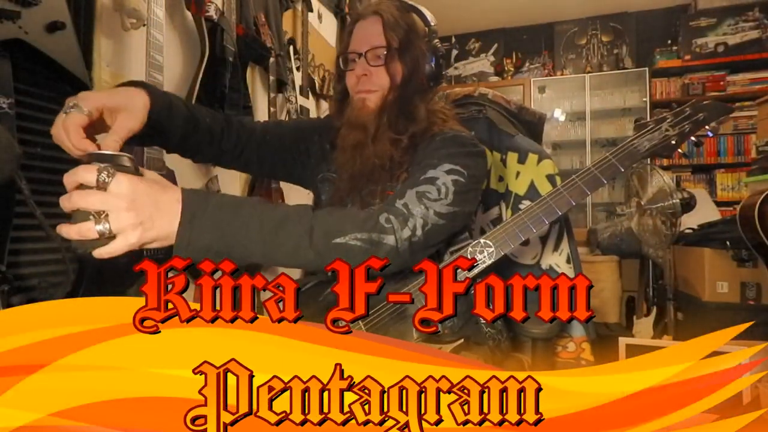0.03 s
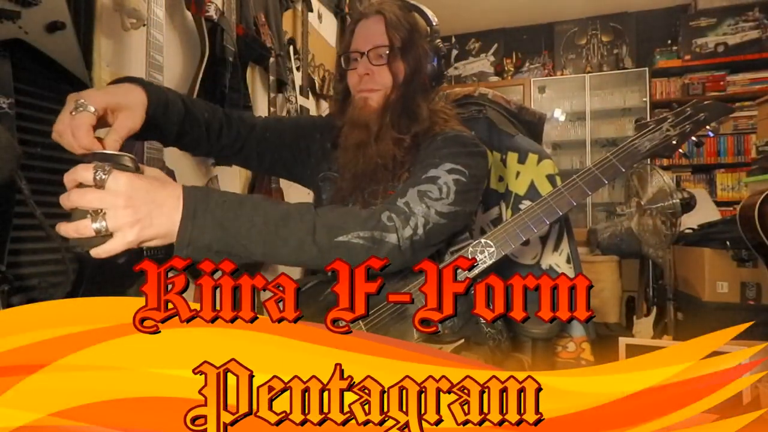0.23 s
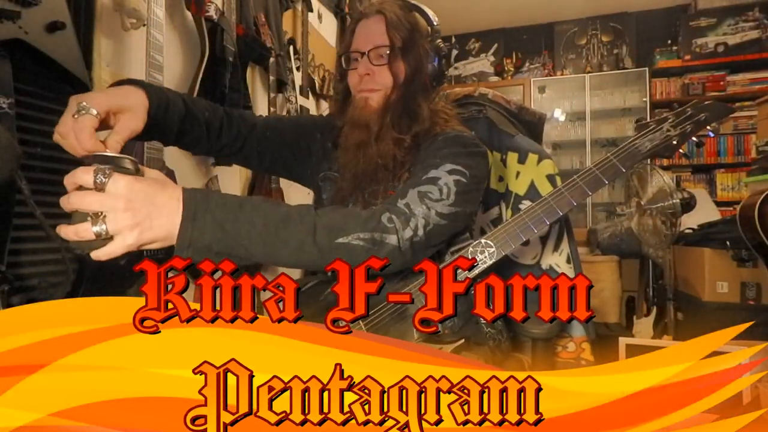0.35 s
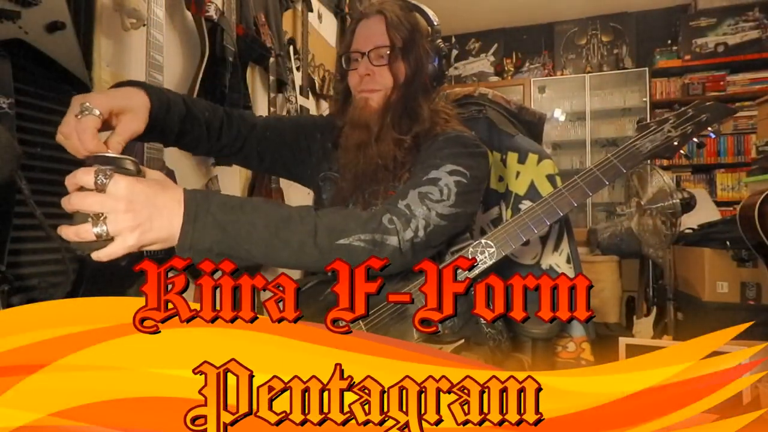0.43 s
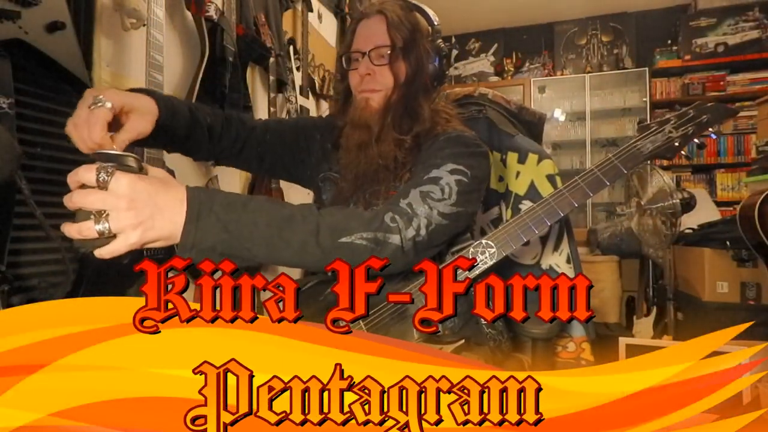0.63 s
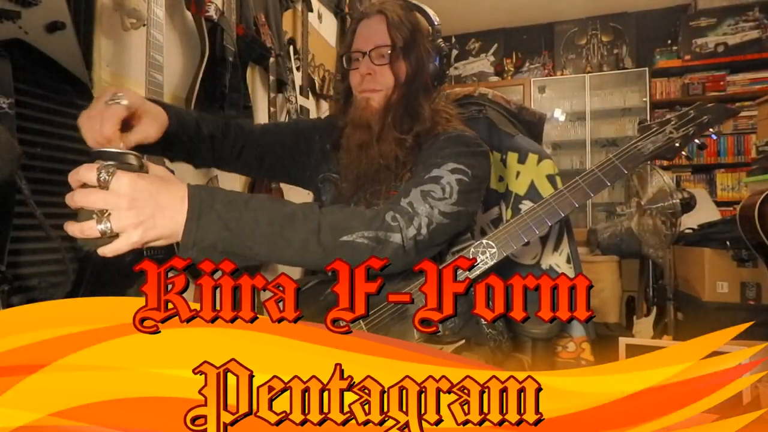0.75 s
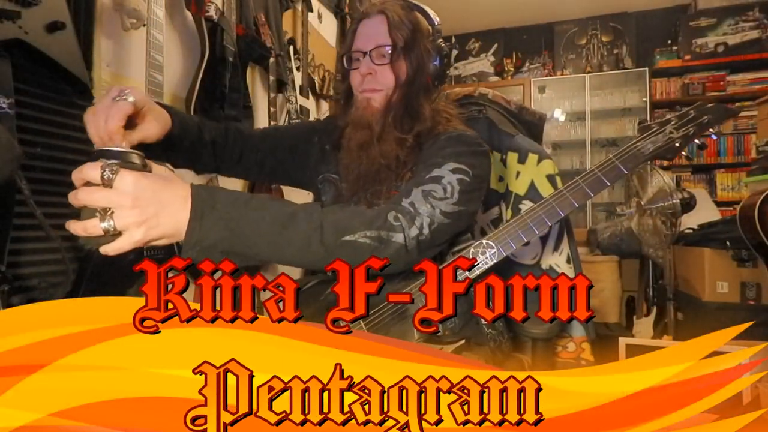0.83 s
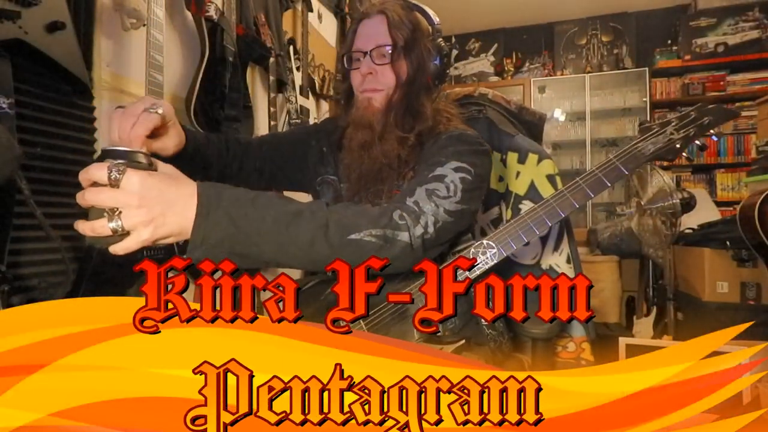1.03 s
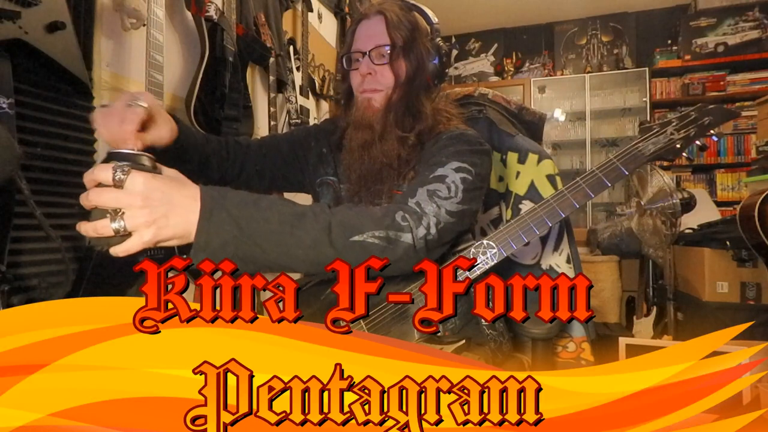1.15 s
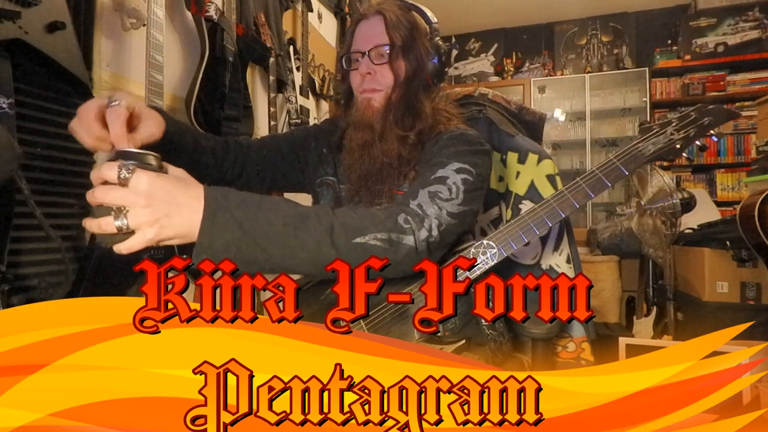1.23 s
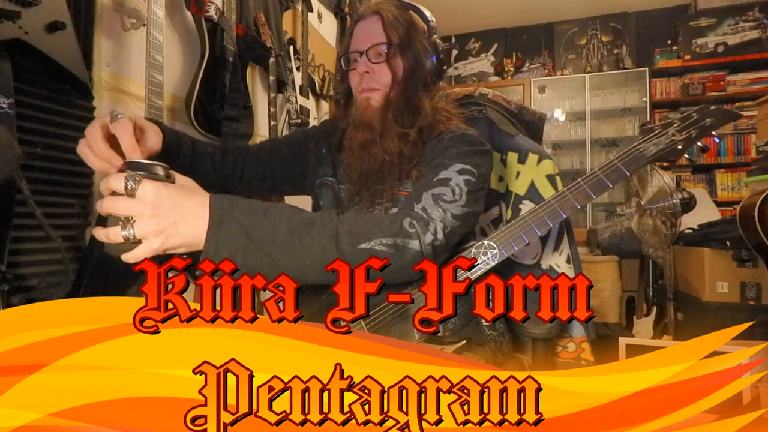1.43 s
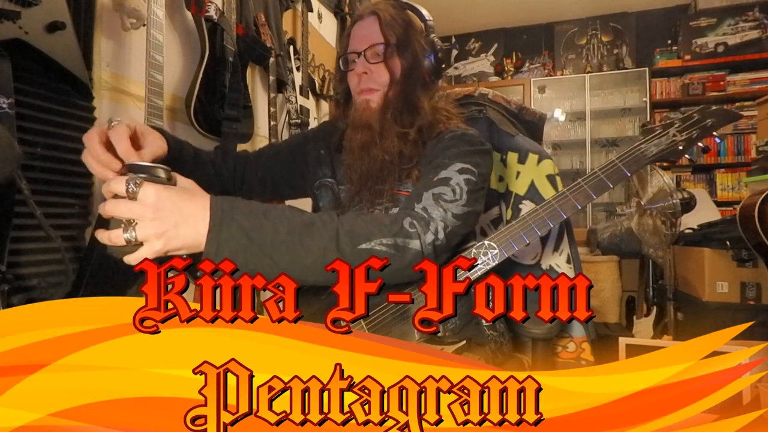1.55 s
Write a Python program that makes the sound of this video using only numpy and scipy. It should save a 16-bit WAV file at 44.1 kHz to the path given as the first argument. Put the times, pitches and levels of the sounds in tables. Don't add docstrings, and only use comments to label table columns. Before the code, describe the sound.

A drink can is popped open close up: sharp snap, hissing crack, ripping burst of gas, small clicks

```python
import sys
import numpy as np
from scipy import signal
from scipy.fft import rfft, irfft
from scipy.io import wavfile

SR = 44100
rng = np.random.default_rng(int(sys.argv[2]) if len(sys.argv) > 2 else 0)


def master_out(mix):
    frames = np.transpose(np.atleast_2d(mix))
    ceiling = np.clip(frames, -1, 1)
    pcm = np.round(ceiling * 32767).astype(np.int16)
    wavfile.write(sys.argv[1], SR, pcm)


def voltage_ratio(level):
    return 10 ** (np.asarray(level, float) / 20)


N = 70560
SNAP_S = 0.23569


def t_axis():
    return np.arange(N) / SR


def age(start_s):
    return np.clip(t_axis() - start_s, 0, None)


def rms_one(x):
    return x / np.sqrt(np.mean(x ** 2) + 1e-20)


def at_hz(points, hz):
    table_hz, db = np.array(points).T
    return np.interp(np.log(hz), np.log(table_hz), db)


def peak(x, hz, width_hz):
    r = np.exp(-np.pi * width_hz / SR)
    poles = [1, -2 * r * np.cos(2 * np.pi * hz / SR), r * r]
    return signal.lfilter((1 - r * r) / 2 * np.array([1, 0, -1]), poles, x)


def steep(x, hz, width_hz):
    return peak(peak(x, hz, width_hz), hz, width_hz)


def peaks(x, table):
    return sum(voltage_ratio(db) * (-1) ** k * peak(x, hz, width_hz) for k, (hz, width_hz, db) in enumerate(table))


def turbulence(rough_db, rate_hz):
    r = np.exp(-2 * np.pi * rate_hz / SR)
    flicker = rms_one(signal.lfilter([1], [1, -2 * r, r * r], rng.standard_normal(N)))
    return rng.standard_normal(N) * voltage_ratio(rough_db * flicker)


def swell(start_s, length_s, edge):
    u = (t_axis() - start_s) / length_s
    return np.sin(np.pi / 2 * np.clip(np.minimum(u, 1 - u) / edge, 0, 1)) ** 2


def timed(times, rows):
    return [(s, *row) for s, row in zip(times, rows)]


# (frequency [Hz], density [dB per Hz])
TONE_SPECTRUM = [(30, -30), (100, -28), (140, -5.5), (600, -8.5), (1500, -6), (4000, -7.5), (9000, -12),
                 (15500, -15.5)]
# (frequency [Hz], side minus mid [dB])
TONE_SIDE = [(60, -14), (500, -19), (900, -22.5), (1500, -35.5), (15000, -34.5)]
# (frequency [Hz], width [Hz], level [dB])
HUM = [(138, 30, -14.5), (379.7, 21, -24)]
TONE_DB, DUCK_DB, DUCK_S, RECOVERY_DB_PER_S = -51.5, -9.5, 0.01, 0.5


def room_tone():
    hz = np.maximum(np.fft.rfftfreq(N, 1 / SR), 10)
    spread = np.array([np.ones_like(hz), voltage_ratio(at_hz(TONE_SIDE, hz))])
    shape = voltage_ratio(at_hz(TONE_SPECTRUM, hz)) * spread
    mid, side = irfft(rfft(rng.standard_normal((2, N))) * shape, N)
    scale = np.std(mid)
    hum = sum(voltage_ratio(db) * rms_one(steep(rng.standard_normal(N), f, width_hz)) for f, width_hz, db in HUM)
    since = age(SNAP_S)
    gain_db = TONE_DB + DUCK_DB * (1 - np.exp(-since / DUCK_S)) + RECOVERY_DB_PER_S * since
    return voltage_ratio(gain_db) * np.array([mid / scale + hum, side / scale])


# (frequency [Hz], width [Hz], level [dB])
LID_TREBLE = [(4996, 1200, 4), (7900, 2300, 2), (10030, 2200, -22), (11900, 20000, -3)]
# (frequency [Hz], width [Hz], level [dB])
LID_BASS = [(636, 600, -1.5), (1100, 160, 2), (2100, 1000, -4)]


def contacts(rows, burst_s, width_hz):
    out = np.zeros(N + SR)
    t = np.arange(1024) / SR
    envelope = np.exp(-t / burst_s) * np.clip(t / 0.0003, 0, 1)
    for s, db, hz, treble_db, bass_db in rows:
        burst = rng.standard_normal(len(t)) * envelope
        pitch = steep(burst, hz, width_hz)
        treble = steep(peaks(burst, LID_TREBLE), 9000, 11000)
        bass = steep(peaks(burst, LID_BASS), 1400, 2500)
        i = int(s * SR)
        for part, rel_db in [(pitch, 0), (treble, treble_db), (bass, bass_db)]:
            out[i:i + len(t)] += voltage_ratio(db + rel_db) * part / np.abs(part).max()
    return out[:N]


# (time [s], peak [dB], pitch [Hz], treble [dB], bass [dB])
TICKS = [(0.0014, -34.5, 3500, -11.5, -26), (0.0652, -37.5, 2580, -9, -15),
         (0.1337, -32.5, 8200, -7.5, -21), (0.1434, -43, 7650, -15, -22), (0.1745, -35.5, 5500, -2, -16),
         (0.2051, -40.5, 2500, -5, -12), (1.225, -53, 3300, -14, -2), (1.4248, -29, 4500, -8, -5.5),
         (1.469, -39, 6640, 1.5, -11.5), (1.5489, -52, 8550, -16, -9), (1.571, -42.5, 5800, -6, -5),
         (1.584, -47, 5990, -14.5, 1), (1.281, -50.5, 1870, 3, -1), (1.316, -56, 1300, -25, -7),
         (1.332, -36.5, 4500, 3, -24), (1.334, -34.5, 7500, 1.5, -15.5)]


def ticks():
    return contacts(TICKS, burst_s=0.00039, width_hz=2000)


# (time [s], length [s])
SWELL_AT = [(.025, .024), (.03, .016), (.185, .048), (.236, .0215), (.24, .016), (.25, .04), (.33, .095),
            (.36, .13), (.43, .024), (.44, .06), (.45, .065), (.49, .055), (.642, .07), (1.222, .02),
            (1.239, .012), (1.336, .016), (1.41, .024), (1.47, .13), (1.545, .016), (1.565, .042)]
# (level [dB], pitch [Hz], width [Hz])
SWELLS = [(-41.5, 3570, 1200), (-50.5, 7760, 1700), (-48.5, 4500, 4500), (-35.5, 2300, 6000),
          (-32.5, 3870, 1200), (-44.5, 3900, 1200), (-35, 4830, 1600), (-40.5, 2130, 1400),
          (-24.5, 8800, 2100), (-42.5, 3800, 820), (-50.5, 7800, 4000), (-60, 4100, 700), (-43.5, 3200, 4000),
          (-58.5, 3200, 410), (-46.5, 2830, 1600), (-57, 2900, 6000), (-53, 3750, 2000), (-59, 8600, 1300),
          (-55.5, 5100, 2240), (-56.5, 3100, 5600)]


def grainy_swells():
    grain = turbulence(2.0, rate_hz=403)
    out = np.zeros(N)
    for (s, length_s), (db, hz, width_hz) in zip(SWELL_AT, SWELLS):
        out += voltage_ratio(db) * swell(s, length_s, edge=0.31) * rms_one(steep(grain, hz, 1.5 * width_hz))
    return out


# (frequency [Hz], level [dB], T60 [s])
SNAP_MODES = [(1300, -31, .006), (2500, -16.5, 0.0066), (4560, -10, .004), (5700, -10.5, 0.0059),
              (7425, -8, 0.0023), (8900, -8, 0.0022), (3790, -14.5, .009), (3989, -1.5, .008),
              (6700, -18.5, 0.01), (9660, -6, 0.0034), (12160, -9.5, 0.0036)]


def snap():
    t = age(SNAP_S)
    ring = sum(voltage_ratio(7.5 + db - 60 * t / t60_s) * np.sin(2 * np.pi * hz * t) for hz, db, t60_s in SNAP_MODES)
    return (1 - np.exp(-t / 0.00023)) * ring


# (time [s], peak [dB], pitch [Hz], T60 [s])
THUMPS = [(.2362, -33, 150, .012), (.2360, -31, 380, .006), (.6395, -40, 450, .015), (.648, -40, 400, .012),
          (1.4252, -56, 350, .015), (.4256, -36, 330, .012), (.6425, -43, 300, .012),
          (.8064, -32, 350, .012), (.810, -42, 130, .03), (.8075, -30, 620, .018), (.4262, -36, 650, .01)]


def thumps():
    out = np.zeros(N)
    for s, db, hz, t60_s in THUMPS:
        t = age(s)
        out += voltage_ratio(db - 60 * t / t60_s) * np.sin(2 * np.pi * hz * t)
    return out


def jet(start_s, full_s, stop_s, first_db, last_db, colour, sputter_db):
    t = t_axis()
    gate = np.clip((t - start_s) / 0.048, 0, 1) * np.exp(-age(stop_s) / 0.0036)
    level = voltage_ratio(np.interp(t, [start_s, full_s], [first_db, last_db]))
    return level * gate * rms_one(peaks(turbulence(sputter_db, rate_hz=250), colour))


# (start [s], full [s], stop [s])
SEEP_S = (.262, .38, .40)
LEAK_S = (.352, .436, .453)
# (first [dB], last [dB])
SEEP_DB = (-49, -39.5)
LEAK_DB = (-38.5, -19.5)
# (frequency [Hz], width [Hz], level [dB])
SEEP_PEAKS = [(4000, 1200, -5), (5230, 1300, -5.5), (8440, 1300, -4), (12800, 2000, -12.5)]
LEAK_PEAKS = [(1200, 1204, -14.5), (2484, 2400, -6.5), (4395, 1400, 4.5), (5600, 650, 3.5), (8520, 1400, 6),
              (13400, 2080, -6.5)]


def leak():
    seep = jet(*SEEP_S, *SEEP_DB, SEEP_PEAKS, sputter_db=1.5)
    return seep + jet(*LEAK_S, *LEAK_DB, LEAK_PEAKS, sputter_db=1)


CRACK_AT = [.3640, .3743, .3857, .3952, .4259, .6383, .6402, .6425, .6478, 1.0088]
# (peak [dB], pitch [Hz], treble [dB], bass [dB])
CRACKS = [(-22, 4500, -4, -26), (-23.5, 4100, -7.5, -24), (-22.5, 6200, -8, -27), (-19, 9000, -6.5, -27),
          (-16, 3500, -1.5, -11), (-12.5, 3200, -4.5, -19.5), (-15, 3200, -4.5, -20.5),
          (-8, 3410, -2.5, -18.5), (-10.5, 3300, -4, -16), (-23.5, 4740, -4.5, -11.5)]


def cracks():
    return contacts(timed(CRACK_AT, CRACKS), burst_s=0.001, width_hz=2100)


PING_S = [.4259]
TAP_S = [.5628, .6035, .6203, .6755, .6832, .6962, 1.0683, 1.0693, 1.0815]
KNOCK_S = [1.3322, 1.3341]
PING_DB = [-7]
TAP_DB = [-35.5, -56, -50, -28.5, -30, -32, -38, -33, -51]
KNOCK_DB = [-28.5, -30]
# (frequency [Hz], width [Hz], level [dB])
PING_PEAKS = [(3607, 180, 0)]
TAP_PEAKS = [(1500, 350, -9.5), (3160, 310, 5), (5160, 600, -11)]
KNOCK_PEAKS = [(1144, 190, -4), (1800, 210, 0.5), (2396, 116, 1), (3430, 160, -3.5), (4650, 330, -8.5)]


def blows(times, levels_db, body):
    clicks = np.zeros(N)
    for s, db in zip(times, levels_db):
        clicks[int(s * SR)] = voltage_ratio(db)
    ring = peaks(np.eye(1, 1024)[0], body)
    return np.convolve(clicks, ring / np.abs(ring).max())[:N]


def knocks():
    taps = blows(TAP_S, TAP_DB, TAP_PEAKS)
    return blows(PING_S, PING_DB, PING_PEAKS) + taps + blows(KNOCK_S, KNOCK_DB, KNOCK_PEAKS)


CREAK_AT = [.6217, .6619, .6755, .6832, .6882, .6962, .7048, .7655, 1.0035, 1.0235, 1.0262, 1.0395, 1.0445,
            1.0468]
# (peak [dB], pitch [Hz], treble [dB], bass [dB])
CREAKS = [(-31.5, 3240, -15, -8), (-32, 3370, -7.5, -7), (-36, 4700, 0, -25), (-39, 4900, -2, -20),
          (-38, 3200, -2, -8), (-40, 5000, -6, -20), (-41.5, 3400, -6, -3), (-48.5, 4500, -8.5, -25),
          (-48, 5500, -4, -14), (-32.5, 4630, -3, -25), (-35.5, 4400, -7.5, -11), (-35.5, 5300, -4, -16),
          (-38.5, 5200, -8.5, -23), (-39, 5500, -8.5, -17)]


def creaks():
    return contacts(timed(CREAK_AT, CREAKS), burst_s=0.00055, width_hz=1400)


# (time [s], peak [dB], pitch [Hz], treble [dB], bass [dB])
TEARS = [
    (.7765, -48, 4500, -11, -17),
    (.7803, -15, 4540, -12.5, -20.5),
    (.7828, -21.5, 4850, -12, -18),
    (.7893, -8, 4500, -7.5, -19),
    (.7932, -15, 4500, -7, -31),
    (.7972, -16, 4600, -8.5, -28),
    (.8000, -14, 4806, -9, -21),
    (.8025, -15, 4560, -6, -17),
    (.8045, -12.5, 4540, -7, -39),
    (.8066, -10, 3300, -7, -34),
]


def tears():
    return contacts(TEARS, burst_s=0.0022, width_hz=1800)


# (frequency [Hz], width [Hz], level [dB])
RUSH_PEAKS = [(950, 514, -7.5), (2330, 486, 0.5), (2990, 326, 4.5), (3930, 2100, -3), (5550, 900, 0),
              (7500, 3100, -8.5), (9500, 3000, -11), (13600, 2700, -14)]
RUSH_S, RUSH_RISE_S, RUSH_DB, RUSH_T60_S, RUSH_DULLING_S = 0.7923, 0.025, -16.5, 0.21, 0.06


def rush():
    t = age(RUSH_S)
    noise = turbulence(1.0, rate_hz=130)
    bands = np.zeros(N)
    for k, (hz, width_hz, db) in enumerate(RUSH_PEAKS):
        fall_db = 60 * t / RUSH_T60_S + t / RUSH_DULLING_S * hz / 1000
        bands += voltage_ratio(db - fall_db) * (-1) ** k * steep(noise, hz, 1.49 * width_hz)
    return voltage_ratio(RUSH_DB + 11.0) * np.clip(t / RUSH_RISE_S, 0, 1) * bands


# (time [s], length [s])
FIZZ_AT = [(.92, .064), (1.008, .014), (1.018, .036), (1.066, .031), (1.221, .022)]
FIZZ_DB = [-47, -44, -50.5, -52.5, -60]
# (frequency [Hz], width [Hz], level [dB])
FIZZ_PEAKS = [(955, 168, 3), (1510, 790, -12), (3014, 330, -6.5), (4830, 470, -42)]


def fizz():
    grain = peaks(turbulence(2.7, rate_hz=130), FIZZ_PEAKS)
    level = sum(voltage_ratio(db) * swell(s, length_s, edge=0.2) for (s, length_s), db in zip(FIZZ_AT, FIZZ_DB))
    return level * rms_one(steep(grain, 1900, 4900))


# (delay [s], level [dB])
ECHOES = [(.0092, -37), (0.0134, -40), (0.0152, -39), (.0205, -42)]
ROOM_DB, ROOM_T60_S, ROOM_HZ, ROOM_WIDTH_HZ, ROOM_SIDE_DB = -21.5, 0.13, 4500, 4200, -21


def room(x):
    t = np.arange(SR // 3) / SR
    tail = rng.standard_normal((2, len(t))) * voltage_ratio(-60 * t / ROOM_T60_S) * np.clip(t / 0.012, 0, 1)
    tail = voltage_ratio(ROOM_DB) * tail / np.sqrt(np.sum(tail[0] ** 2))
    for s, db in ECHOES:
        tail += voltage_ratio(db) * rng.standard_normal(len(t)) * (t >= s) * np.exp(-np.abs(t - s) / 0.00022)
    tail[1] *= voltage_ratio(ROOM_SIDE_DB)
    return signal.fftconvolve(peak(tail, ROOM_HZ, ROOM_WIDTH_HZ), x[None], axes=1)[:, :N]


def scene():
    metal = ticks() + snap() + thumps() + cracks() + knocks() + creaks() + tears()
    can = metal + grainy_swells() + leak() + rush() + fizz()
    mid, side = room(can) + room_tone()
    return np.array([can + mid + side, can + mid - side])


def top_cut(x):
    return signal.sosfilt(signal.butter(12, 15680, fs=SR, output="sos"), x)


TOP, GLITCH_S, GLITCH_DB = 1.0, 0.23578, -7


def record(dry):
    soft = signal.sosfilt(signal.butter(4, 15000, fs=SR, output="sos"), dry)
    glitch = voltage_ratio(GLITCH_DB) * (np.arange(N) == int(GLITCH_S * SR)) * np.array([[0], [-2]])
    mix = np.clip(np.clip(soft, -TOP, TOP) + glitch, -TOP, TOP)
    return top_cut(mix)


dry = scene()
out = record(dry)
master_out(out)
```